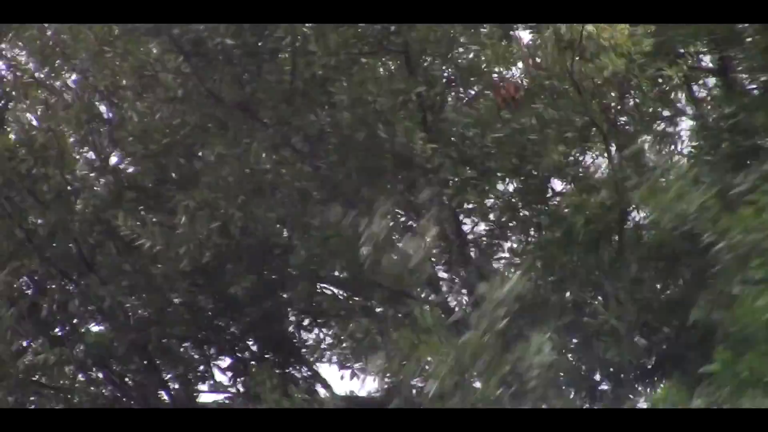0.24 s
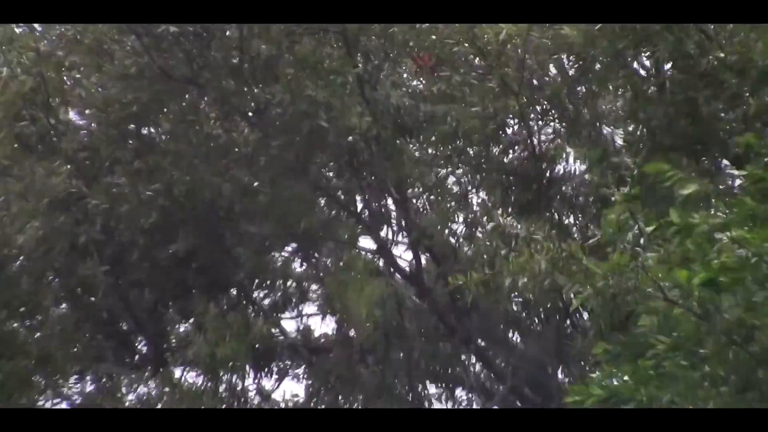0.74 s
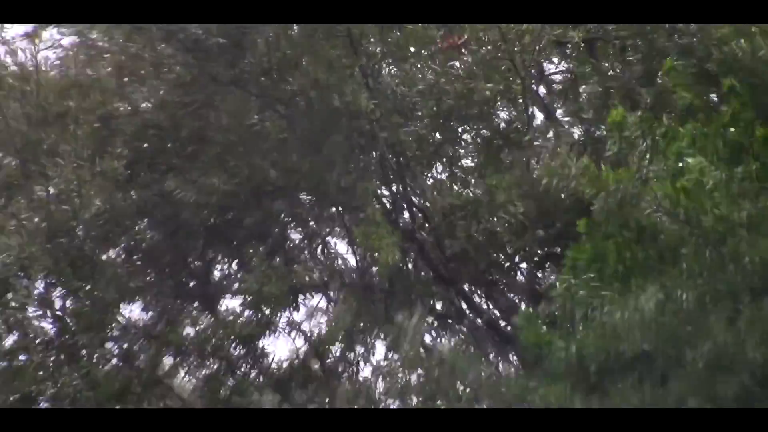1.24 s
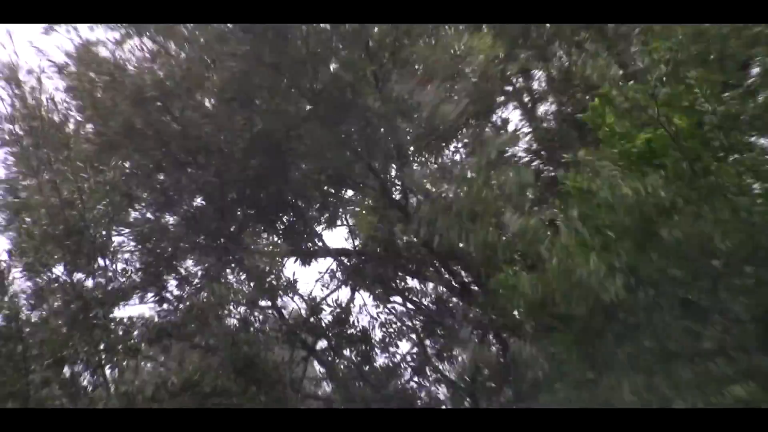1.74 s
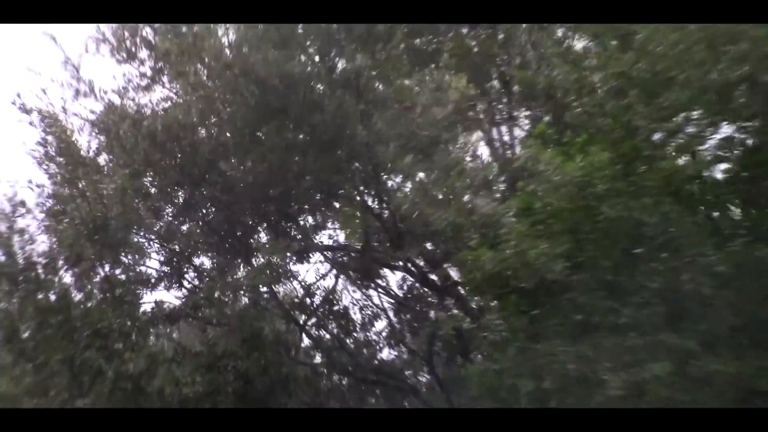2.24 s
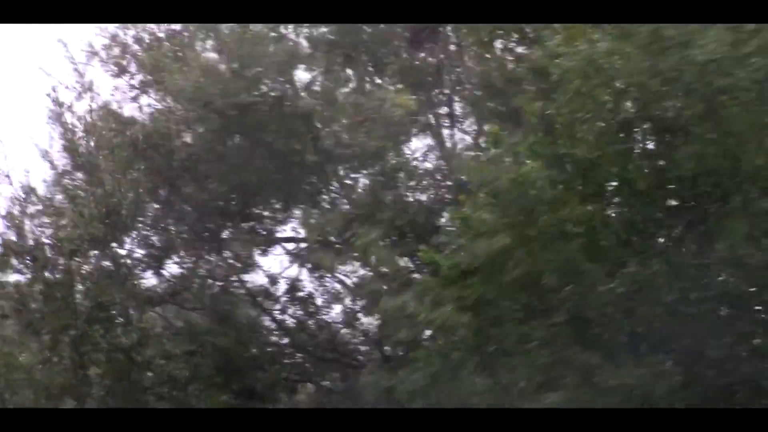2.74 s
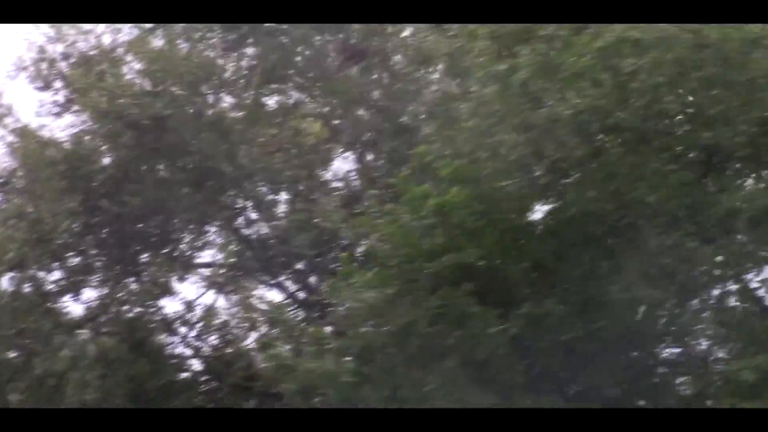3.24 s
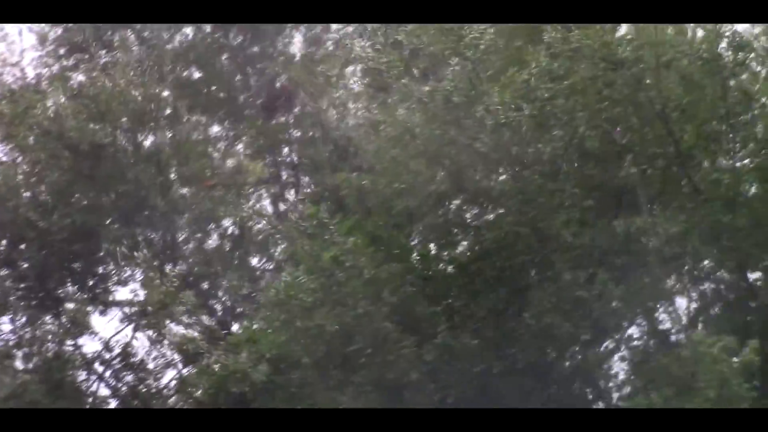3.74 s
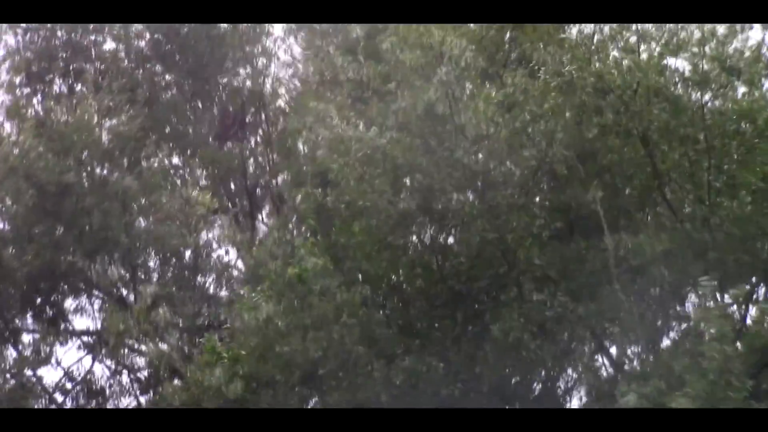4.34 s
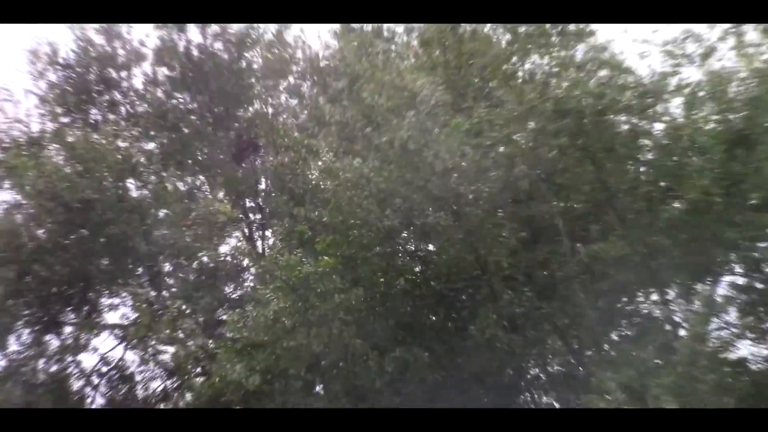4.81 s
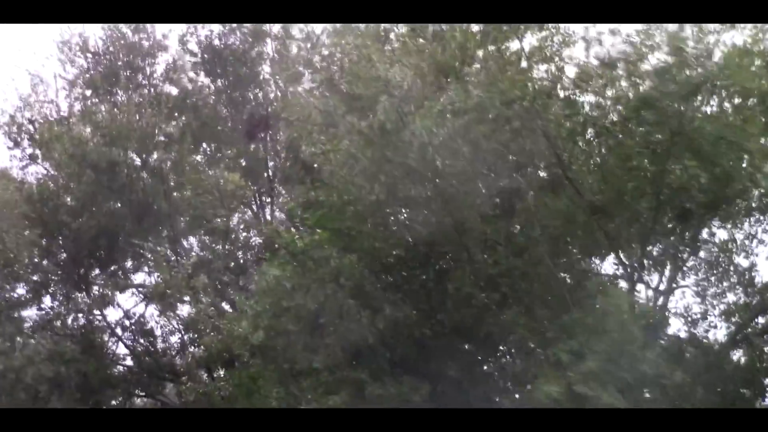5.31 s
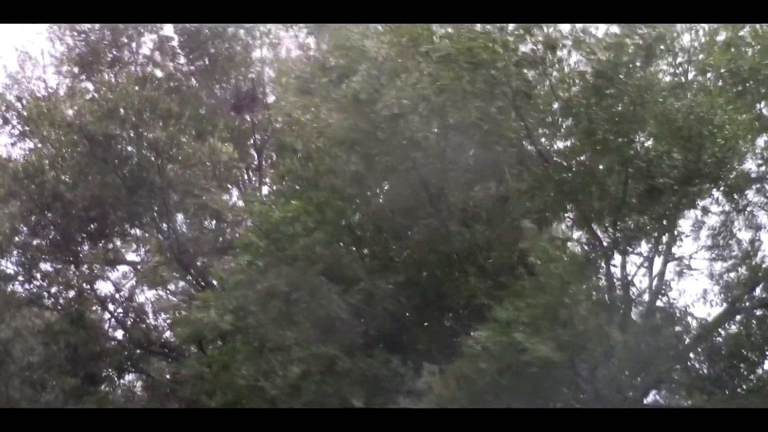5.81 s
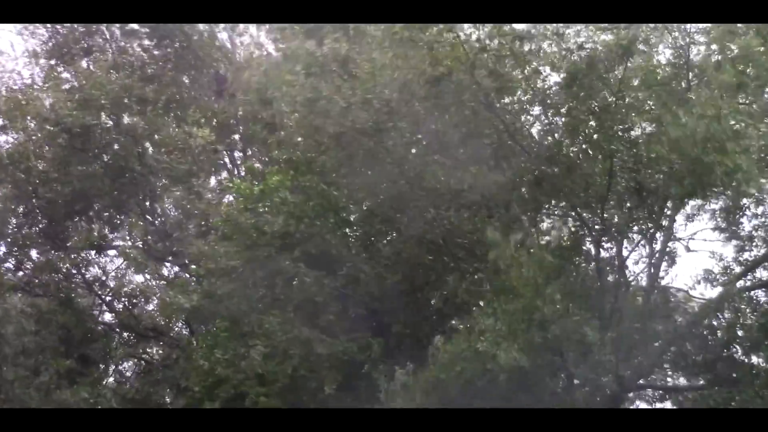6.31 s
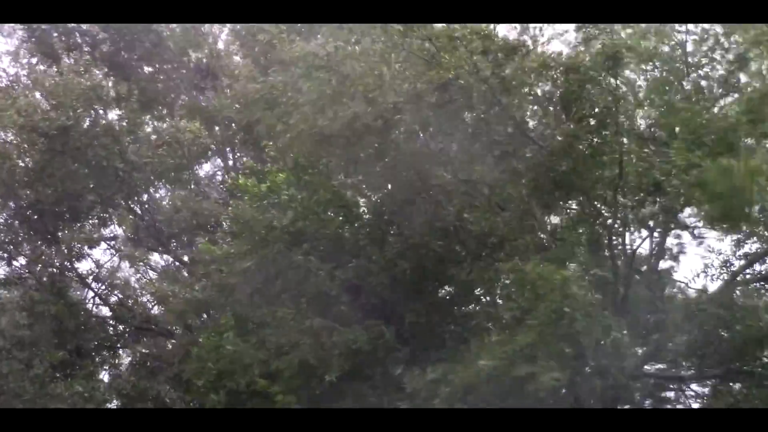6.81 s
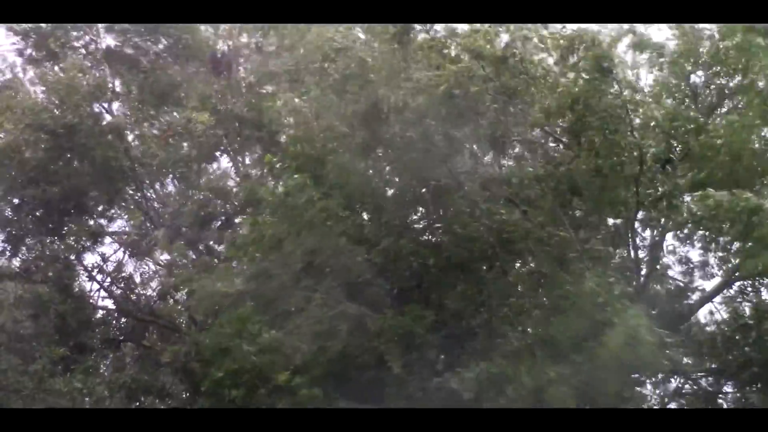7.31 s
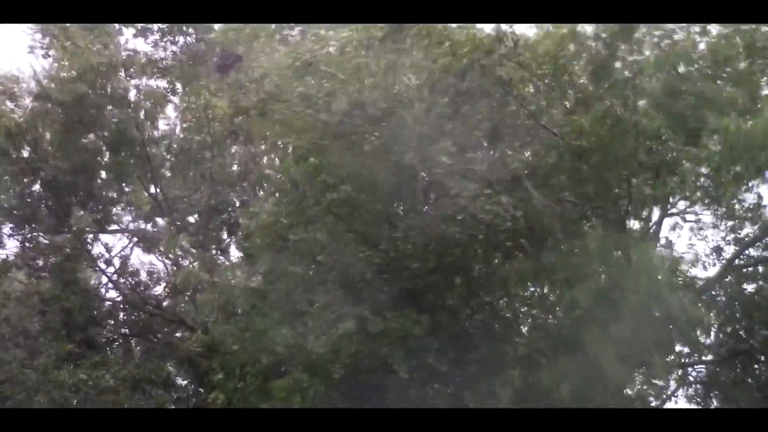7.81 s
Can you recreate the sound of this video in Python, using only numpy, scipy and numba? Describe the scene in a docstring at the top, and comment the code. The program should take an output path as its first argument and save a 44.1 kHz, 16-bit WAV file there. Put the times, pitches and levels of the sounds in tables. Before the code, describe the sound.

Wind blows hard through dense trees, a broad low roar of boughs under a bright, shivering leaf hiss. A few soft thumps open, then the microphone stays fairly clear for about three seconds. From nearly four seconds, low buffeting arrives in clusters, growing violent and overloaded, pushing the rushing foliage down between thuds. Close, mono outdoor sound without echo.

```python
"""Among leafy trees in a storm, wind roars and hisses while eddies thump a small mono microphone.
Boughs and leaves are shaped noise with gusting levels; the churning air is low-frequency noise.
Each eddy is a smooth hump of pressure or suction that displaces the churn.
Hard thumps drive the recorder's limiter, which ducks the roar and lets it swell back."""
import sys
import numpy as np
from scipy import signal
from scipy.fft import rfft, irfft, next_fast_len
from scipy.io import wavfile
from scipy.ndimage import uniform_filter1d, map_coordinates
from numba import njit

SR = 44100
rng = np.random.default_rng(int(sys.argv[2]) if len(sys.argv) > 2 else 0)


def master_out(mix):
    """Clip the mix to full scale and print it as 16-bit PCM to the path in sys.argv[1]."""
    frames = np.transpose(np.atleast_2d(mix))
    ceiling = np.clip(frames, -1, 1)
    pcm = np.round(ceiling * 32767).astype(np.int16)
    wavfile.write(sys.argv[1], SR, pcm)


N = 355446  # samples

# Wind in the trees, mean course before gusting: start_s [s], roar_db [dB], hiss_db [dB]
TREE_LEVELS = [(0, -17, -22), (1.6, -17.5, -22.5), (2.3, -18.5, -25), (3.6, -18, -24), (4.4, -15.5, -21.5),
               (5.1, -17.5, -22), (5.9, -15.5, -21), (6.5, -17.5, -21.5), (7.3, -13.5, -20),
               (8.06, -14, -20)]
# Churning air at the microphone: start_s [s], rumble_db [dB]
CHURN_LEVELS = [(0, -12.5), (.36, -15), (.6, -24.5), (1.5, -29), (3.55, -23.5), (4, -3.5), (4.27, -10),
                (4.5, -3), (4.75, -15), (5.15, -15), (5.35, 6), (5.5, 3.5), (5.6, -7.5), (5.75, 3.5),
                (5.87, -10), (6, 4), (6.3, -5), (6.5, -17.5), (6.75, 4), (6.87, -4.5), (7.13, 1), (7.21, 7),
                (7.33, -4), (7.75, -0.5), (7.9, 3.5), (8.06, 2)]
# Hard eddies before the recorder: centre_s [s], peak_db [dB], length_ms [ms, width at 1/e of the peak or near it]
HARD_EDDIES = [(0.055, -6, 26), (0.185, -6, 27), (0.335, -4.5, 24), (3.649, 1, 22), (3.733, 0.5, 17),
               (3.768, 6, 17), (3.842, 3.5, 10.6), (4.014, 8.5, 8.6), (4.075, 8, 13.4), (4.128, 8, 33),
               (4.181, 7.5, 16), (4.232, 6, 16), (4.57, 6.5, 20), (4.625, 9, 18), (4.68, 9.5, 30),
               (4.731, 8, 21), (4.845, 5.5, 22), (4.91, 6.5, 49), (5.209, 0.5, 35), (5.263, 0.5, 34),
               (5.311, 11, 9.5), (5.337, 17.5, 20), (5.378, 15.5, 14), (5.48, 11, 20), (5.525, 18.5, 12.7),
               (5.636, 15.5, 11.4), (5.691, 8, 14), (5.732, 12, 20), (5.757, 5, 23), (5.946, 4, 10),
               (6.017, 14.5, 24), (6.06, 5, 25), (6.135, 11, 13), (6.236, 10.5, 6.8), (6.287, 10, 14),
               (6.62, 7.5, 45), (6.684, 16, 25), (6.725, 16, 19), (6.774, 10.5, 18), (6.814, 1.5, 20),
               (6.991, 12.5, 12), (7.064, 16, 18.4), (7.175, 19, 9.8), (7.195, 23, 8), (7.238, 20, 14.5),
               (7.362, 14.5, 14), (7.454, 10.5, 15), (7.526, 10.5, 11.7), (7.609, 7.5, 7.1),
               (7.679, 15, 15.8), (7.714, 9.5, 24), (7.764, 9, 8.9), (7.845, 9.5, 18), (7.889, 13, 25),
               (7.934, 12, 14), (7.971, 5.5, 18.5)]
# Spectrum of the boughs' roar: frequency_hz [Hz], relative_level_db [dB]
BOUGH_SPECTRUM = [(24, -34), (40, -4.5), (71, -4), (98, 2.5), (214, -1.5), (320, -4.5), (450, -3.5),
                  (700, -6.5), (1000, -10), (1600, -14.5), (2500, -19.5), (3300, -24.5), (5500, -120)]
# Spectrum of the leaves' hiss: frequency_hz [Hz], relative_level_db [dB]
LEAF_SPECTRUM = [(710, -8), (1200, -8.5), (2360, -4.5), (5740, -1), (11400, -19), (13400, -24.5),
                 (15600, -37)]
# Spectrum of the air's rumble: frequency_hz [Hz], relative_level_db [dB]
RUMBLE_SPECTRUM = [(2, -7), (5, -11), (11, -4), (20, -9.5), (35, -6), (60, -17), (100, -20), (160, -33),
                   (300, -40.5), (600, -120)]

SOFT_PER_S = 9  # soft eddies a second
SOFT_OVER_CHURN_DB, SOFT_CEILING_DB = 8, 4  # both apply before the scatter
SOFT_SCATTER_DB = 2.5
SOFT_MEDIAN_MS, SOFT_LOG_SPREAD = 14.3, 0.26
TOP_HZ = 15780  # upper limit of the recorder's band


def amp(db):
    """Decibel law: the amplitude gain of a level in dB."""
    return 10 ** (np.asarray(db) / 20)


def unit(x):
    """Normalization: x scaled to an rms of 1."""
    return x / np.sqrt(np.mean(x ** 2))


def curves(rows):
    """Linear interpolation: one value per sample for each column after the time."""
    s, *columns = np.transpose(rows)
    t = np.arange(N) / SR
    return [np.interp(t, s, column) for column in columns]


def wobble(rate_hz):
    """Band-limited fluctuation: a smooth curve through random knots, rate_hz of them a second."""
    knots = rng.standard_normal(int(N * rate_hz / SR) + 4)
    return map_coordinates(knots, [np.arange(N) * rate_hz / SR])


def filtered(x, response):
    """Linear filtering: the spectrum of x times a response of frequency."""
    size = next_fast_len(N + SR // 2)  # padded against wrap-around
    spectrum = rfft(x, size) * response(np.fft.rfftfreq(size, 1 / SR))
    return irfft(spectrum, size)[:N]


def rush(spectrum, patchy_db, flutter_db=0):
    """Turbulent noise: a coloured spectrum of rms 1, with random gain patches and a fine flutter."""
    z = signal.stft(rng.standard_normal(N), nperseg=512)[2]
    # Smooth the random gains over neighbouring frequencies, then over time
    patches = uniform_filter1d(rng.standard_normal(z.shape), size=8, axis=0)
    patches = uniform_filter1d(patches, size=14, axis=1)
    noise = signal.istft(z * amp(patchy_db * unit(patches)), nperseg=512)[1][:N]
    noise = noise * amp(flutter_db * wobble(400))
    hz, db = np.transpose(spectrum)

    def colour(f):
        """Spectral shaping: levels interpolated along log frequency."""
        return amp(np.interp(np.log(f + 1), np.log(hz + 1), db))

    return unit(filtered(noise, colour))


def trees():
    """Superposed wind noise: boughs roar smoothly, leaves hiss and shiver, and both share the gusts."""
    roar_db, hiss_db = curves(TREE_LEVELS)
    gust = wobble(2.015)
    shiver_db = 0.5 * wobble(14)
    roar = amp(roar_db + 0.25 * gust) * rush(BOUGH_SPECTRUM, patchy_db=0.48)
    hiss = rush(LEAF_SPECTRUM, patchy_db=-0.16, flutter_db=0.66)
    return roar + amp(hiss_db + 0.46 * gust + shiver_db) * hiss


def churn():
    """Turbulent pressure: low-frequency noise with a lumpy random envelope follows the wind's level."""
    lumps = amp(2.0 * wobble(12))
    return amp(curves(CHURN_LEVELS)[0]) * unit(lumps * rush(RUMBLE_SPECTRUM, patchy_db=0.5))


def soft_eddies():
    """Random arrival: small eddies, one per time slot, whose strength follows the churn up to a ceiling."""
    slots = np.arange(int(N / SR * SOFT_PER_S))
    s = (slots + rng.uniform(size=len(slots))) / SOFT_PER_S
    strength, length = rng.standard_normal((len(slots), 2)).T
    churn_db = np.interp(s, *np.transpose(CHURN_LEVELS))
    db = np.minimum(churn_db + SOFT_OVER_CHURN_DB, SOFT_CEILING_DB) + SOFT_SCATTER_DB * strength
    ms = SOFT_MEDIAN_MS * np.exp(SOFT_LOG_SPREAD * length)
    return list(zip(s, db, ms))


def add_eddies(air, eddies):
    """Displacement: each eddy suppresses the air's churn and adds pressure or suction in turn."""
    t = np.arange(N) / SR
    sign = 1
    for (s, db, ms), lean in zip(eddies, rng.uniform(-1, 1, len(eddies))):
        near = slice(max(round((s - .1) * SR), 0), round((s + .1) * SR))
        u = (t[near] - s) / (ms / 2000)  # time in half-lengths
        hump = np.exp(-np.abs(u) ** 2.9)
        tilted = hump * (1 + 0.28 * lean * np.tanh(u))  # leaning forward or back
        air[near] = air[near] * (1 - 0.84 * hump) + sign * amp(db) * tilted
        sign = -sign
    return air


def buffeting():
    """Turbulence at the capsule: soft, then hard eddies are set into the lumpy rumble."""
    air = add_eddies(churn(), soft_eddies())
    return add_eddies(air, HARD_EDDIES)


def scene():
    """Superposition: trees and buffeting add at one capsule, which feeds both channels."""
    return np.tile(trees() + buffeting(), (2, 1))


@njit
def follow(level, rise, fall):
    """Envelope detection: a one-pole follower with separate rates for rise and fall."""
    out, held = np.empty_like(level), level[0]
    for i in range(len(level)):
        held += (rise if level[i] > held else fall) * (level[i] - held)
        out[i] = held
    return out


def coupling(x, corner_hz):
    """Capacitive coupling: a first-order high-pass, under which flat tops droop."""
    return filtered(x, lambda hz: 1j * hz / (corner_hz + 1j * hz))


def limiter(x):
    """Gain reduction: a quick-rising, slower-falling envelope turns down whatever sounds with it."""
    attack_ms, release_ms = 1.4, 14.7  # time constants of the envelope raised to power
    threshold_db, knee, power = -4.0, 2.38, 1.48
    rise, fall = 1000 / (attack_ms * SR), 1000 / (release_ms * SR)
    held = follow(np.abs(x) ** power, rise, fall) ** (1 / power)
    return x / (1 + (held / amp(threshold_db)) ** knee) ** (1 / knee)


def record(dry):
    """Recording chain: coupling, limiter, coupling, saturation and band limit, in that order."""
    x = limiter(coupling(dry[0], corner_hz=3.7))
    x = coupling(x, corner_hz=3)
    x = x / (1 + np.abs(x) ** 14) ** (1 / 14)  # overload ceiling
    return np.tile(filtered(x, lambda hz: hz < TOP_HZ), (2, 1))


dry = scene()
out = record(dry)
master_out(out)
```